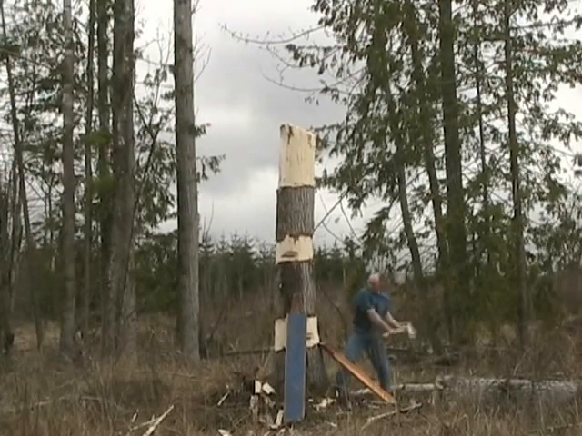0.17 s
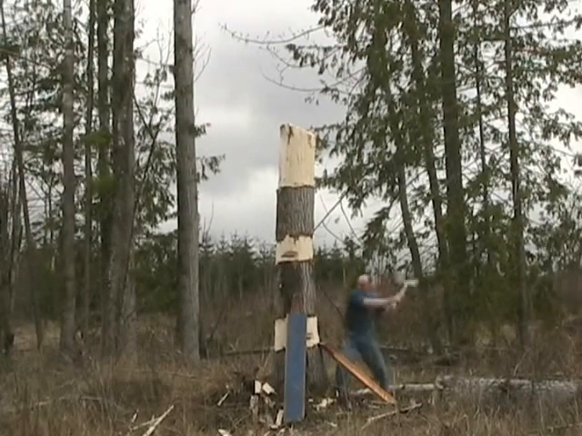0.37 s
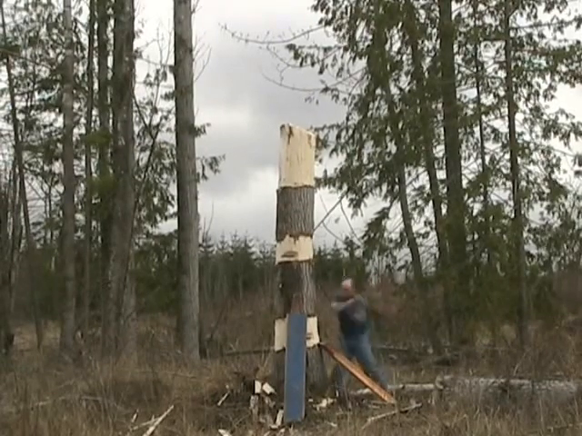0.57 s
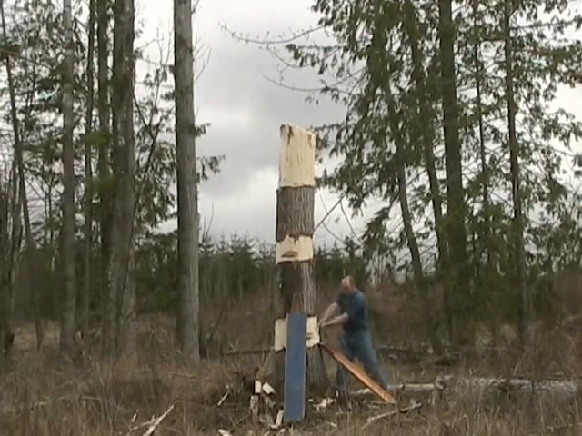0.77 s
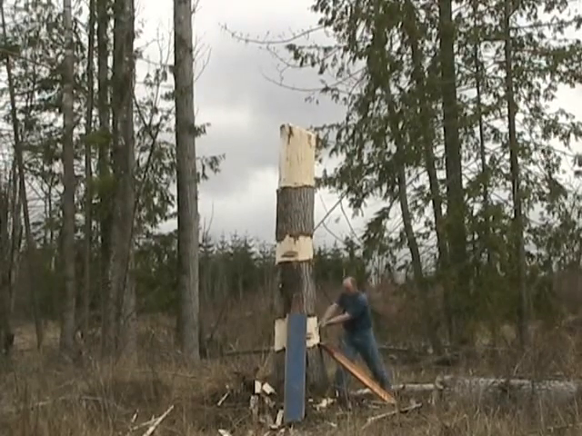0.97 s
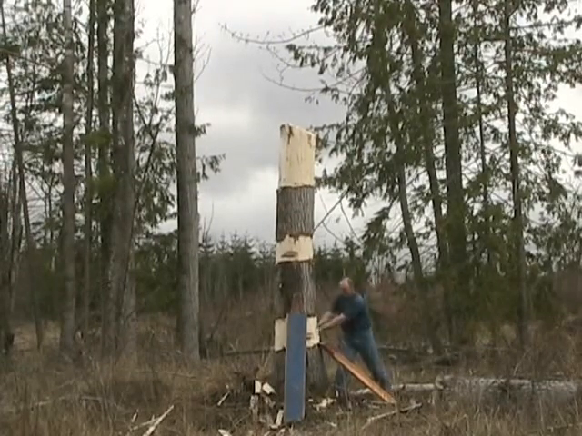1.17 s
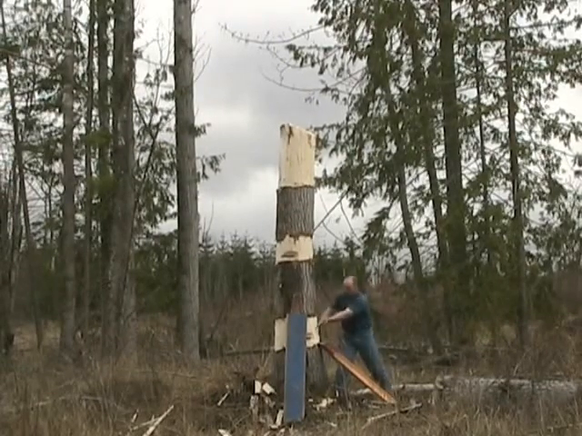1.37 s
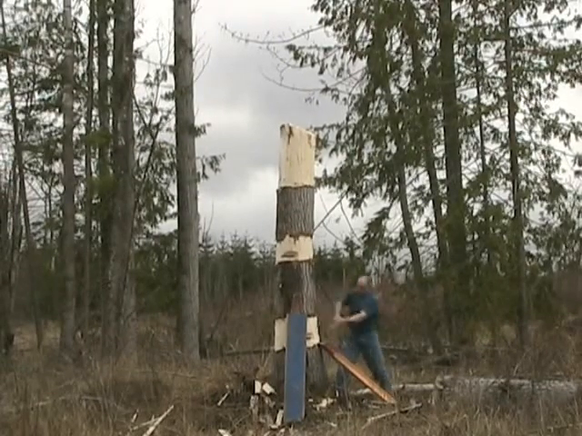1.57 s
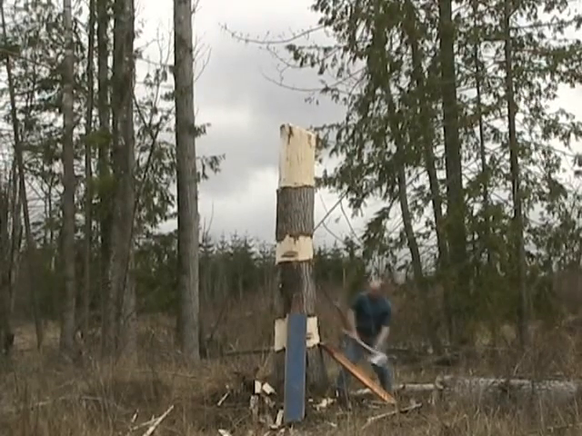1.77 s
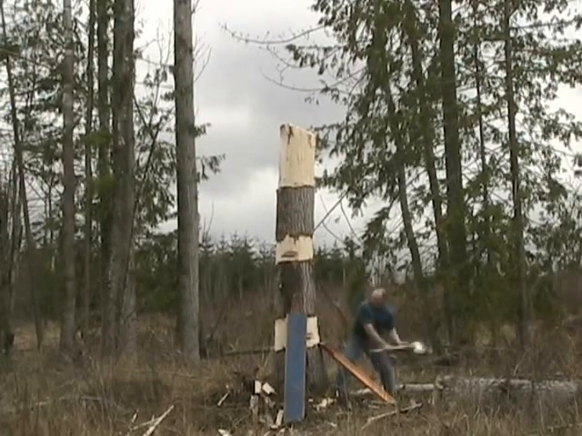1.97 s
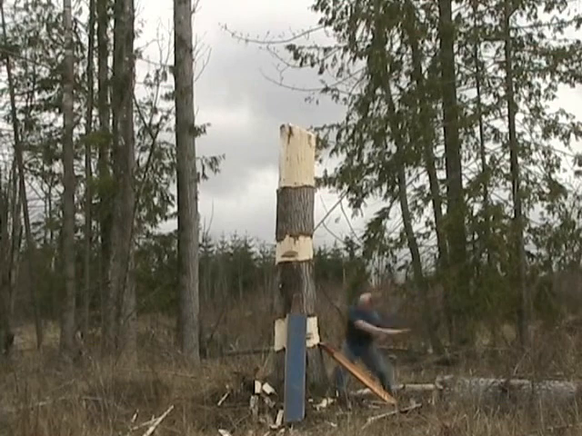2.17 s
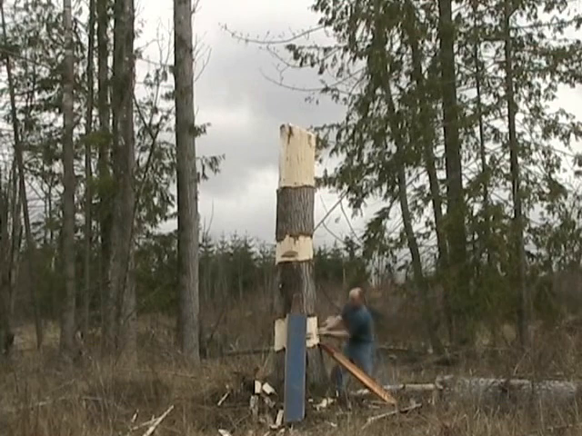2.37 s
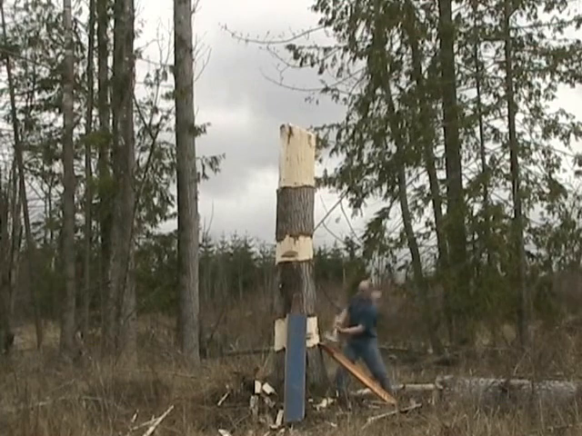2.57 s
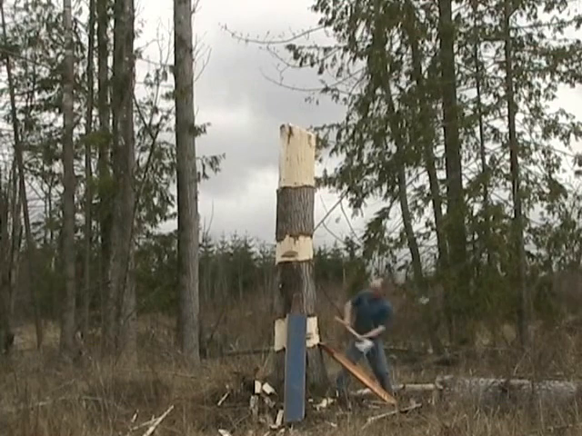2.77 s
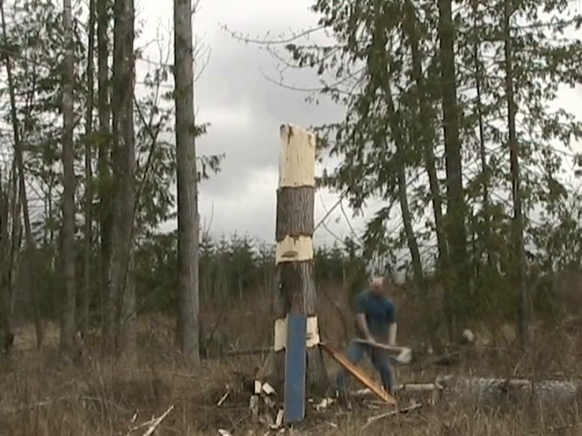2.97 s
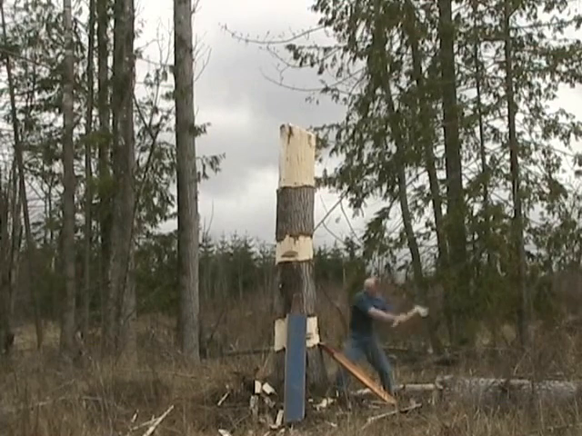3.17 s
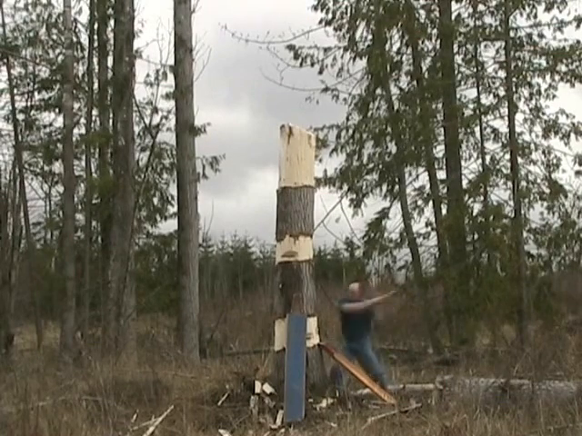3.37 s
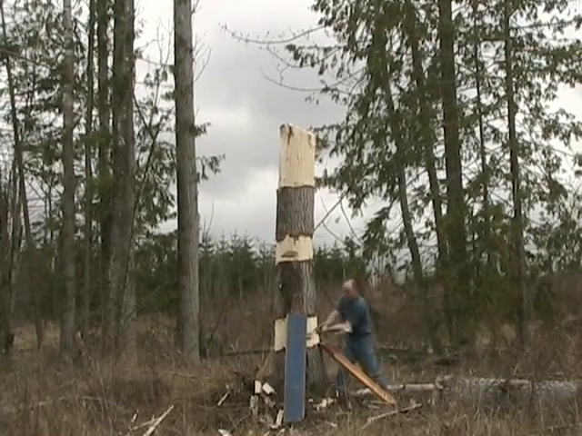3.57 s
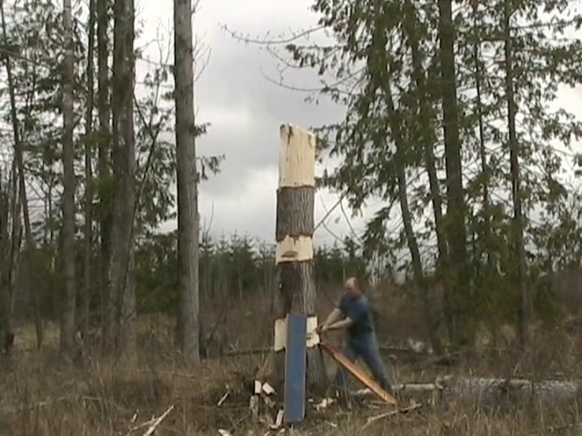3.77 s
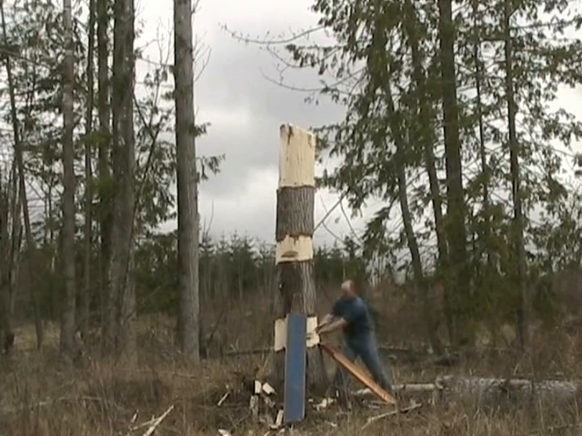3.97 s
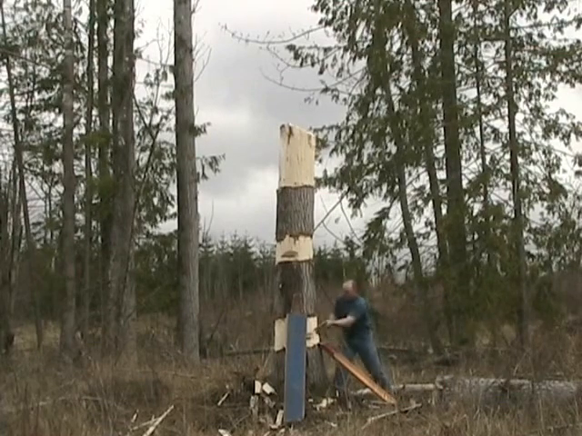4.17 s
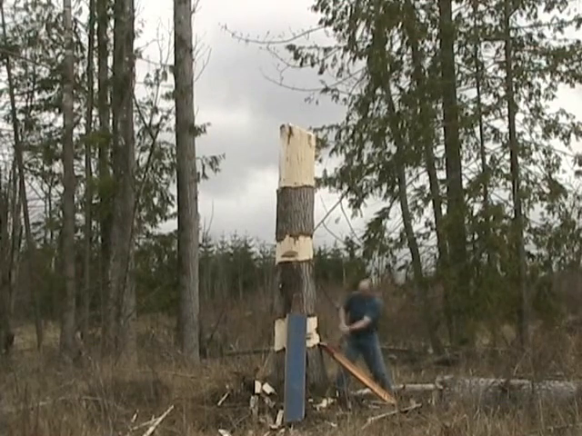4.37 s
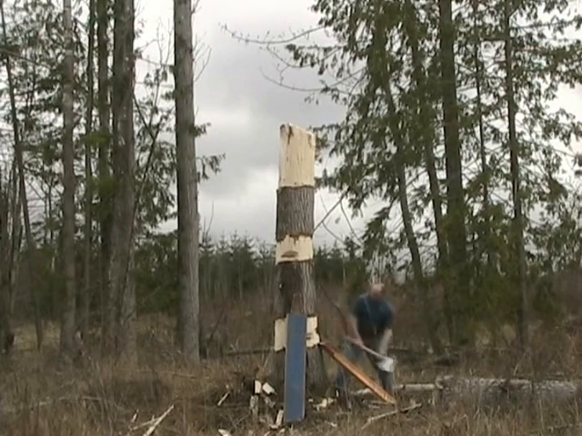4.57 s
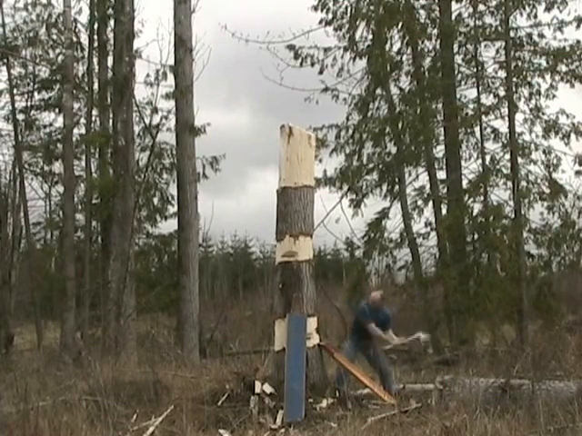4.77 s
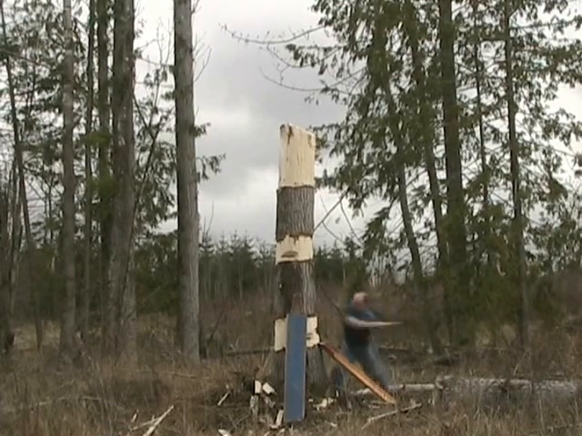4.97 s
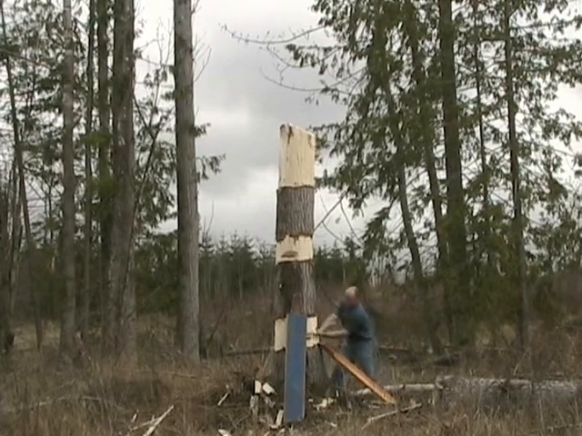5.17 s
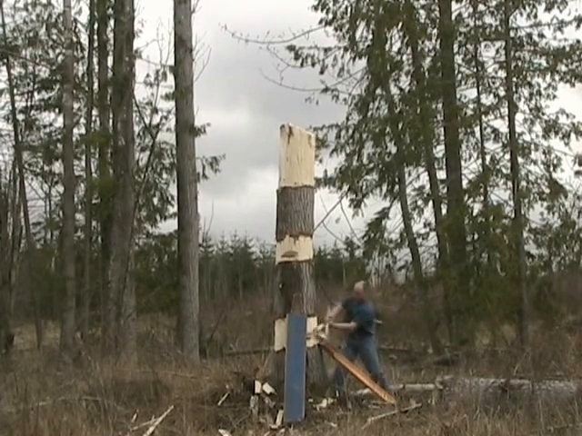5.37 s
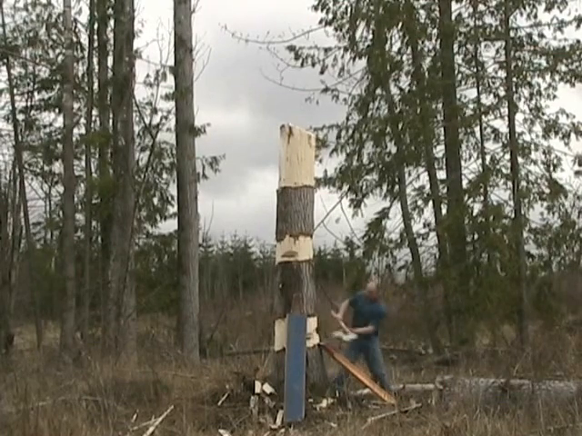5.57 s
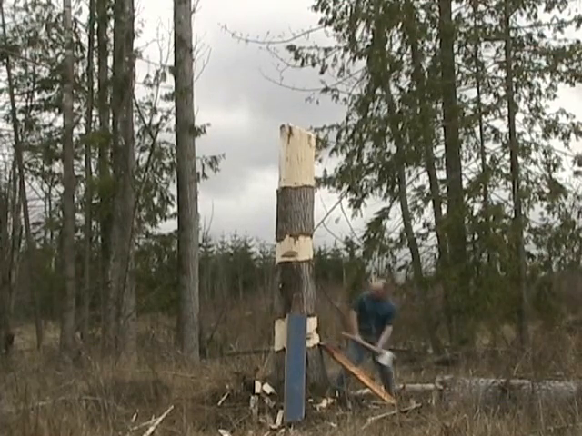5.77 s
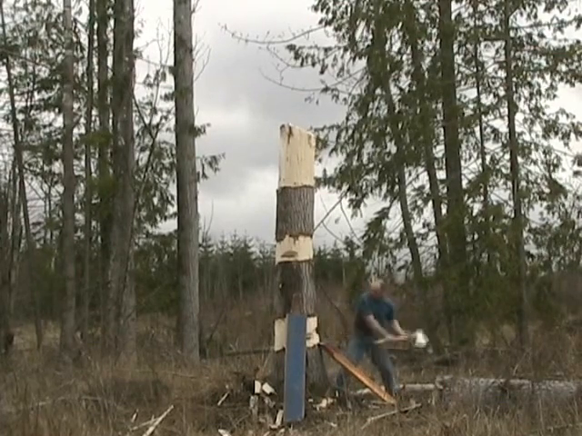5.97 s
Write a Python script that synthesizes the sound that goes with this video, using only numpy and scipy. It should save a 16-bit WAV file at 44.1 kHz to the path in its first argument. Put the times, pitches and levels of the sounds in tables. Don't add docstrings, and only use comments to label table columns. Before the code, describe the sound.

Outdoors in a forest clearing, an axe strikes a standing log four times, about a second or more apart. Each loud, woody crack clips the close stereo microphone and echoes back from surrounding trunks. A distant songbird whistles, buzzes and chirps between blows. Chips and boots rustle in brush, wind bumps the microphone, and a thin motor whine and hiss lie underneath.

```python
import sys
import numpy as np
from scipy import signal
from scipy.fft import rfft, irfft, next_fast_len
from scipy.io import wavfile

SR = 44100
rng = np.random.default_rng(int(sys.argv[2]) if len(sys.argv) > 2 else 0)


def gain_from_decibels(decibels):
    exponent = np.asarray(decibels, float) / 20
    return 10 ** exponent


def to_wav(sig):
    pcm = np.clip(np.atleast_2d(sig), -1, 1) * 32767
    pcm = np.round(pcm).astype(np.int16)
    wavfile.write(sys.argv[1], SR, pcm.T)


N = 265923

# [t/s, length/s, level/dB pushing the ports apart, level/dB on both alike]
GUSTS = [(0, 0.23, -34, -43.5), (.18, 0.21, -35, -47), (0.407, .16, -45, -51.5), (0.577, 0.15, -39, -50.5),
         (.8, 0.18, -43.5, -52), (1.02, 0.22, -34.5, -51), (1.333, 0.11, -41, -54.5),
         (1.473, 0.23, -30, -45), (1.732, 0.085, -48, -43), (1.95, .22, -54, -51), (2.2, 0.13, -49, -48),
         (2.433, 0.19, -59, -54.5), (3.23, 0.26, -41.5, -53.5), (3.744, 0.11, -44, -50),
         (3.952, 0.055, -42, -55), (4.133, 0.29, -39, -58.5), (4.5, 0.3, -36.5, -55.5),
         (4.84, 0.18, -41, -69), (5.043, 0.17, -39.5, -65), (5.31, 0.15, -24, -51),
         (5.437, 0.087, -21, -36), (5.566, 0.2, -35.5, -48), (5.864, 0.081, -24, -35.5),
         (5.99, 0.024, -26, -36)]
# [level/dB apart, level/dB alike]
LULL = [-61, -60.5]

# [f/Hz, level/dB per Hz]
HUSH_COLOUR = [(90, -19), (160, -5), (580, -1.5), (1300, -2.5), (2500, -6.5), (9900, -12), (10600, -20),
               (15400, -27.5)]
# [f/Hz, likeness/-1..1]
HUSH_LIKENESS = [(60, -0.67), (290, 0.2), (640, 0.25), (1400, 0.6), (3070, 0.18), (9900, -0.52),
                 (10600, -.8), (14800, -0.66)]
# [f/Hz, width/Hz, level/dB]
CASING = [(1330, 190, 3), (3090, 450, 1), (4870, 630, 2), (6400, 430, 5), (8600, 400, 2.5),
          (11860, 1200, 5), (14100, 500, 4)]

# [f/Hz, level/dB rms]
DRIVE_LINES = [(585.4, -71), (1247, -74), (3997, -72), (4434, -74), (4797, -75), (4883, -76), (6449, -77),
               (7526, -78), (8290, -77), (8340, -71), (8419, -76), (8538, -78), (9060, -79), (9421, -78)]
# [multiple of the pole rate, level/dB rms]
POLES = [(3, -69), (5, -70), (6, -71), (7, -66), (9, -73), (13, -75), (14, -76), (15, -74)]
# [multiple of the capstan rate, level/dB rms]
CAPSTAN = [(2, -64.5), (3, -69), (4, -76)]

# [t/s, length/s, from f/Hz, to f/Hz, middle level/dB]
WHISTLES = [
    (.74, .303, 4690, 4658, -53),
    (2.9, .335, 4480, 4370, -55.5),
    (3.24, .14, 4400, 4360, -62),
]
# [t/s, length/s, from f/Hz, to f/Hz, level/dB]
BUZZES = [
    (1.12, .237, 5250, 5150, -49),
    (3.33, .17, 5200, 6000, -52),
    (3.51, .13, 5300, 5250, -51),
    (4.288, .22, 4900, 4350, -48.5),
]
# [span/Hz, rate/sweeps per s, swell/dB]
BUZZ_SWEEPS = [(-1800, 166, 7), (1300, 166, 0), (-1600, 166, 0), (1000, 117, 0)]
# [t/s, end f/Hz, level/dB]
FALLS = [
    (1.433, 3600, -54.5),
    (1.582, 3150, -54),
    (1.714, 3350, -59),
    (1.858, 3050, -59),
    (3.862, 3500, -57),
    (4.005, 3500, -55),
    (4.165, 3450, -54),
]
# [t/s, length/s, from f/Hz, to f/Hz, level/dB]
FLICKS = [
    (1.5, .018, 6000, 4800, -60),
    (1.535, .015, 3900, 4300, -58),
    (1.815, .02, 3900, 4400, -61),
    (4.117, .03, 3400, 5200, -57),
    (4.612, .014, 4900, 5400, -55),
    (4.62, .04, 4700, 3500, -63),
    (4.785, .045, 4300, 3300, -65),
]

# [t/s, strength/dB, bite length/s, crack level/dB]
BLOWS = [
    (0.784, -1.5, 0.004, -4.5),
    (2.4802, 2.5, 0.0052, 0),
    (3.642, -4, 0.009, 5.5),
    (5.2445, 3, 0.0076, 1.5),
]
# [f/Hz, width/Hz, level/dB]
WOOD = [
    [(737, 120, -2), (940, 115, 2.5), (1390, 170, -6), (2000, 160, -21), (2500, 95, -41), (3370, 220, -54)],
    [(457, 213, 2.5), (800, 190, 3.5), (1280, 620, 0), (1600, 200, 8), (2560, 330, -3), (3360, 170, 3)],
    [(463, 89, 1.5), (893, 136, 3.5), (1430, 170, -2), (1817, 88, -5), (3100, 180, -50), (3560, 120, -29)],
    [(448, 112, 1.5), (890, 200, 6.5), (1357, 190, 7), (1773, 120, -1.5), (2930, 91, -12.5),
     (3230, 89, -30)],
]
# [f/Hz, width/Hz, level/dB]
LOG = [(334, 120, -16.5), (510, 130, -7.5)]
# [delay/s, level/dB, fade/s]
SPLITS = [
    (0.00807, -5, 0.0075),
    (0.0103, -13, 0.0053),
    (.0095, 7, 0.0047),
    (0.0099, -13, 0.0073),
]
# [f/Hz, level/dB per band]
CRACK = [(1500, 3.5), (3000, 9), (6300, 4), (9000, 3), (12000, -19), (16000, -16)]
# [f/Hz, level/dB left minus right]
PORT_BALANCE = [(300, -0.5), (2000, 1.7), (4000, -0.5), (12000, -0.5)]
# [delay/s, level/dB, dull above f/Hz]
NEAR_TRUNK = (0.0232, -12.5, 1120)
# [delay/s, size/dB]
TRUNKS = [(0.049, -0.5), (.062, 4), (.078, 1.5), (0.106, -1.5), (.155, 5), (.185, 4.5), (0.233, 5),
          (.259, 3.5), (0.28, 1.5), (0.316, 2), (0.347, 1.5), (.377, 0.5), (0.449, 0.5), (.501, -4.5),
          (.537, -2.5), (0.591, 2), (.671, 1.5)]
# [f/Hz, extra loss/dB per s, left-right likeness]
SCATTER = [(242, 32.5, 1), (510, 0.5, 0.95), (950, 4, 0.96), (2000, 9.5, 0.9), (4000, 18, 0.66),
           (8200, 45, .5)]
# [f/Hz, level/dB per Hz]
RADIATED = [
    [(200, -4.5), (237, -29), (560, -8), (770, 2), (1200, 0), (3760, -28.5), (4760, -22), (11000, -38.5)],
    [(200, -23), (284, -20), (765, 1), (1090, -6), (2130, -3.5), (4020, -19.5), (8130, -33), (11000, -56)],
    [(200, -7), (257, -22.5), (411, -6), (620, -8), (790, -1), (1180, -3), (6650, -32.5), (11000, -46)],
    [(200, -21.5), (791, -4.5), (1140, -5.5), (1330, 1.5), (1470, -7.5), (7610, -35), (10100, -51),
     (11000, -82)],
]
# [f/Hz, level/dB per Hz]
RADIATED_ENDS = [(120, -48), (14300, -85), (22000, -120)]

# [t/s, length/s, level/dB, centre f/Hz, rate/grains per s]
RUSTLES = [
    (1.45, 0.04, -47, 6000, 2940),
    (2.525, 0.17, -38.5, 4000, 4400),
    (3.251, 0.12, -50, 6500, 6000),
    (3.7, 0.22, -47.5, 4960, 1630),
    (4.103, 0.12, -45, 6750, 7200),
    (4.223, 0.054, -43, 3500, 1300),
    (5.376, 0.12, -44, 4840, 1200),
    (5.624, 0.041, -48, 2530, 1900),
    (6.014, .04, -49, 890, 2700),
]
# [t/s, peak level/dB, ring f/Hz]
TICKS = [
    (4.0915, -27, 2570),
    (4.232, -36, 1800),
    (5.305, -19, 1400),
    (5.447, -33, 4000),
    (5.9228, -26, 1800),
    (5.996, -27, 220),
    (6.0145, -24, 420),
]


def column(points, hz, index=1):
    points = np.array(points, float)
    return np.interp(np.log(np.maximum(hz, 1)), np.log(points[:, 0]), points[:, index])


def rms_one(x):
    return x / np.sqrt(np.mean(x ** 2) + 1e-20)


def drift(rate):
    r = np.exp(-80 * np.pi * rate / SR)
    slow = signal.lfilter([1], [1, -2 * r, r * r], rng.standard_normal(N // 40 + 2002))[2000:]
    return np.interp(np.arange(N) / 40, np.arange(len(slow)), rms_one(slow))


def band(x, low_hz, high_hz, order=2):
    edges = [low_hz, min(high_hz, .45 * SR)]
    return signal.sosfilt(signal.butter(order, edges, "band", fs=SR, output="sos"), x)


def resonate(x, hz, width_hz):
    r = np.exp(-np.pi * max(width_hz, 20) / SR)
    zeros = np.array([1, 0, -1]) * (1 - r * r) / 2
    return signal.lfilter(zeros, [1, -2 * r * np.cos(2 * np.pi * hz / SR), r * r], x)


def coloured(x, gain):
    return irfft(rfft(x) * gain(np.fft.rfftfreq(x.shape[-1], 1 / SR)), x.shape[-1])


def stereo(mid, side, alike):
    alike = np.clip(alike, -1, 1)
    return np.sqrt((1 + alike) / 2) * mid + np.sqrt((1 - alike) / 2) * side * [[1], [-1]]


def add(out, sound, s):
    i = round(s * SR)
    out[..., i:i + sound.shape[-1]] += sound[..., :out.shape[-1] - i]


def gusts():
    rise_s, fall_s, swell_db = 0.023, 0.03, 2
    t = np.arange(N) / SR
    power = gain_from_decibels(2 * np.array(LULL))[:, None]
    for s, length, *db in GUSTS:
        i, j = max(round((s - .3) * SR), 0), round((s + length + .3) * SR)
        u = t[i:j] - s
        swell = swell_db * (np.clip(u / length, 0, 1) - .5)
        rise = 8 * np.minimum(u, 0) / rise_s
        fall = 8 * np.maximum(u - length, 0) / fall_s
        gust = gain_from_decibels(2 * (np.array(db)[:, None] + swell + rise - fall))
        power = power + np.pad(gust, ((0, 0), (i, N - i - u.size)))
    return 10 * np.log10(power)


def buffet(level_db, lumpy_db, bright_db, low_hz):
    lumps = lumpy_db * drift(13.0)
    rumble = rms_one(band(rng.standard_normal(N), low_hz, 131.4))
    flutter = rms_one(band(rng.standard_normal(N), 120, 333))
    spit = rms_one(band(rng.standard_normal(N), 350, 1500, order=1))
    over_db = level_db + lumps + 28.5
    turbulence = rumble + gain_from_decibels(bright_db + 0.27 * over_db) * flutter + gain_from_decibels(-31.0 + .5 * over_db) * spit
    return gain_from_decibels(level_db + lumps - 3.5) * turbulence


def wind():
    apart_db, alike_db = gusts()
    push = buffet(apart_db, lumpy_db=3.5, bright_db=-23, low_hz=29.3)
    both = buffet(alike_db, lumpy_db=4.0, bright_db=-6.5, low_hz=41.0)
    return both + push * gain_from_decibels(np.array([[-.5], [.5]])) * [[1], [-1]]


def hush():
    def tone(hz):
        casing_db = sum(db / (1 + (2 * (hz - at) / width) ** 2) for at, width, db in CASING)
        return gain_from_decibels(column(HUSH_COLOUR, hz) + casing_db)

    def side_tone(hz):
        alike = np.clip(column(HUSH_LIKENESS, hz), -.95, .95)
        return tone(hz) * np.sqrt((1 - alike) / (1 + alike))

    mid, side = rng.standard_normal((2, next_fast_len(N)))
    mid, side = coloured(mid, tone), coloured(side, side_tone)
    level = gain_from_decibels(-52.5 + 0.2 + .35 * drift(1.2))
    return level / np.std(mid) * (mid + side * [[1], [-1]])[:, :N]


def drive():
    drum_hz, drum_db, capstan_hz = 149.42, -82, 1554.25
    comb = [(k * drum_hz, drum_db - k / 12 + 3 * rng.standard_normal()) for k in range(3, 66)]
    poles = [(3 * k * drum_hz, db) for k, db in POLES]
    capstan = [(k * capstan_hz, db) for k, db in CAPSTAN]
    hz, db = np.transpose(list(DRIVE_LINES) + comb + poles + capstan)
    t = np.arange(N // 4 + 1) / SR
    phase = rng.random(len(hz)) * 2 * np.pi
    lead = np.pi * np.minimum(hz, 5000) * 2.2 / SR + .15 * rng.standard_normal(len(hz))
    level = np.sqrt(2) * gain_from_decibels(db) / np.maximum(np.cos(lead), .5)
    out = np.zeros((2, 4 * len(t)))
    turn = np.exp(2j * np.pi * hz[:, None] * t).astype(np.complex64)
    for part in range(4):
        first = part * len(t)
        start = np.exp(1j * (phase + 2 * np.pi * hz * first / SR + lead * [[-1], [1]]))
        out[:, first:first + len(t)] = ((level * start).astype(np.complex64) @ turn).real
    return out[:, :N] * gain_from_decibels(2.1 + 1.0 * drift(3.8))


def note(hz, level):
    return np.sqrt(2) * level * np.sin(2 * np.pi * np.cumsum(hz) / SR)


def whistles(song, wobble):
    for s, length, from_hz, to_hz, db in WHISTLES:
        u = np.linspace(0, 1, round(length * SR))
        edge = np.clip(np.minimum(u, 1 - u) * length / 0.0039, 0, 1)
        swell_db = 50 * length * (u - .5)
        waver_db = 2 * wobble[round(s * SR):][:u.size]
        add(song, note(from_hz + (to_hz - from_hz) * u, gain_from_decibels(db + swell_db + waver_db) * edge), s)


def buzzes(song, wobble):
    for (s, length, from_hz, to_hz, db), (sweep_hz, rate_hz, swell_db) in zip(BUZZES, BUZZ_SWEEPS):
        u = np.linspace(0, 1, round(length * SR))
        cycle = (u * length * rate_hz + .06 * wobble[:u.size]) % 1
        sweep = sweep_hz * (cycle - .72)
        pitch = from_hz + (to_hz - from_hz) * u + sweep + 70 * wobble[-u.size:]
        pulses = np.sin(np.pi * cycle ** 1.7) ** .45
        whole = np.sin(np.pi * u) ** .2
        add(song, note(pitch, gain_from_decibels(db + swell_db * (u - .5)) * pulses * whole), s)


def chirps(song):
    fall_from_hz, fall_s = 6700, .054
    falls = [(s, fall_s, fall_from_hz, hz, db) for s, hz, db in FALLS]
    for s, length, from_hz, to_hz, db in list(FLICKS) + falls:
        u = np.linspace(0, 1, round(length * SR))
        bend = (1 - np.exp(-2.8 * u)) / (1 - np.exp(-2.8))
        level = gain_from_decibels(db + 3) * np.sin(np.pi * u ** .55) ** .5
        add(song, note(from_hz + (to_hz - from_hz) * bend, level), s)


def bird():
    song, wobble = np.zeros(N), drift(66.0)
    whistles(song, wobble)
    buzzes(song, wobble)
    chirps(song)
    t = np.arange(4000) / SR
    smear = rng.standard_normal((2, t.size)) * np.exp(-t / .03) * gain_from_decibels(-38)
    direct = np.array([np.roll(song, 1), song])
    return direct + signal.fftconvolve(smear, song[None], axes=1)[:, :N]


def at_ports(hit):
    lag_s = 3.6e-5

    def left(hz):
        return gain_from_decibels(column(PORT_BALANCE, hz)) * np.exp(1j * -2 * np.pi * hz * lag_s)

    return np.array([coloured(hit, left), hit])


def blow(length, crack_db, thud_db, modes, split):
    t = np.arange(4096) / SR
    delay, split_db, fade = split
    bite = np.clip(t / 0.0011, 0, 1) * np.exp(-(t / length) ** 2)
    opening = np.clip((t - delay) / 0.00055, 0, 1)
    later = gain_from_decibels(split_db) * opening * np.exp(-np.maximum(t - delay, 0) / fade)
    snaps = rng.standard_normal(t.size) * gain_from_decibels(3.04 * rng.exponential(1, t.size))
    tearing = snaps * bite + band(snaps * later, 350, 1140, order=1)
    wood = 0
    for k, (hz, width, db) in enumerate(list(LOG) + list(modes)):
        wood = wood + (-1) ** k * gain_from_decibels(db) * resonate(tearing, hz, width)
    flash = np.clip(t / 0.0027, 0, 1) * (np.exp(-t / 0.0024) + gain_from_decibels(-25.5) * np.exp(-t / 0.0072))
    crack = sum(gain_from_decibels(db) * band(snaps * flash, hz / 1.43, hz * 1.283) for hz, db in CRACK)
    thud = band(bite, 157, 510)
    wood, crack, thud = [x / np.abs(x).max() for x in (wood, crack, thud)]
    return wood + gain_from_decibels(crack_db) * crack + gain_from_decibels(thud_db) * thud


def forest():
    diffuse_db, diffuse_t60_s = -12.5, 1.74
    trunk_db = -31
    t = np.arange(49152) / SR
    power = gain_from_decibels(2 * diffuse_db - 120 * t / diffuse_t60_s) * np.clip(t / 0.014, 0, 1)
    hold = np.exp(-1 / (0.0038 * SR))
    for delay, size_db in TRUNKS:
        spread = 0.0029 + 0.015 * delay
        burst = gain_from_decibels(2 * (trunk_db + size_db)) / delay ** 2 * np.exp(-.5 * ((t - delay) / spread) ** 2)
        power = power + signal.lfilter([1 - hold], [1, -hold], burst + 1e-18)
    white = rng.standard_normal((2, 2, t.size))
    response = 0
    for k, (hz, loss_db, alike) in enumerate(SCATTER):
        clumps_db = 1.8 * np.interp(t, t[k::400], white[0, 0, k::400])
        level = np.sqrt(power) * gain_from_decibels(clumps_db - loss_db * (t - 0.2745))
        mid, side = band(white[k % 2] * level, hz / 2 ** .5, hz * 2 ** .5)
        response = response + stereo(mid, side, alike)
    return response


def axe():
    out = np.zeros((2, N))
    delay, near_db, dull_hz = NEAR_TRUNK
    for (s, db, length, crack_db), modes, split, radiated in zip(BLOWS, WOOD, SPLITS, RADIATED):
        thud_db = -22.5 + 1.6 * db
        hit = at_ports(gain_from_decibels(db + 3.0) * blow(length, crack_db, thud_db, modes, split))
        add(out, hit, s)
        add(out, gain_from_decibels(near_db) * band(hit, 310, dull_hz, order=1), s + delay)
        colour = sorted(list(radiated) + list(RADIATED_ENDS))
        echoes = coloured(forest(), lambda hz: gain_from_decibels(column(colour, hz)))
        echo_db = -27 + 0.41 * db
        add(out, gain_from_decibels(echo_db) * echoes / np.std(echoes[:, 2000:4400]), s)
    return out


def rustles():
    out = np.zeros((2, N))
    t = np.arange(8192) / SR
    for s, length, db, hz, per_s in RUSTLES:
        chance, push, size = rng.random((3, 8192))
        shape = np.clip(t / (0.18 * length), 0, 1) * np.clip(1 - t / length, 0, 1)
        grains = (chance < per_s / SR) * (push - .5) / (size + 0.45)
        grains = grains + 0.031 * rng.standard_normal(8192)
        brush = band(band(grains, hz / 2.2, hz * 2.2, order=1), 200, 10500, order=4)
        clump = gain_from_decibels(db) * rms_one(brush) * shape
        add(out, np.array([np.roll(clump, 1), clump]), s)
    return out


def ticks():
    out = np.zeros((2, N))
    for s, db, hz in TICKS:
        click = rng.standard_normal(1024) * np.exp(-np.arange(1024) / (0.0022 * SR))
        tick = resonate(click, hz, min(650, .5 * hz)) + 0.04 * band(click, 2000, 8930, order=1)
        add(out, at_ports(gain_from_decibels(db) * tick / np.abs(tick).max()), s)
    return out


def scene():
    return wind() + hush() + drive() + bird() + axe() + rustles() + ticks()


def band_limit(x):
    return signal.sosfilt(signal.butter(12, 15440, fs=SR, output="sos"), x)


def record(dry):
    clipped = np.clip(dry, -.98, .98)
    dull = signal.sosfilt(signal.butter(2, 11300, fs=SR, output="sos"), clipped)
    return band_limit(dull)


dry = scene()
out = record(dry)
to_wav(out)
```